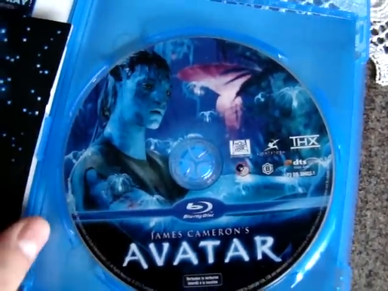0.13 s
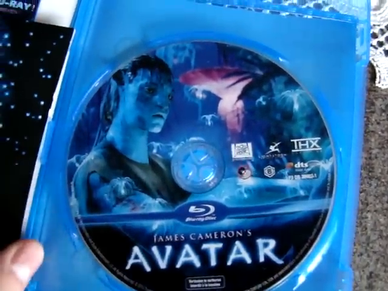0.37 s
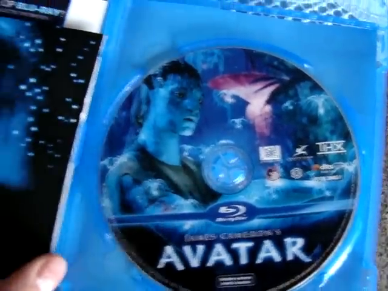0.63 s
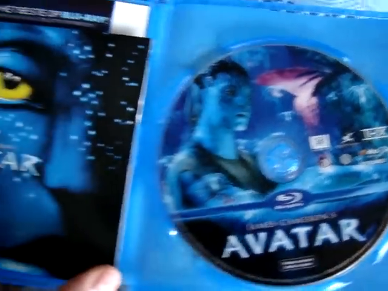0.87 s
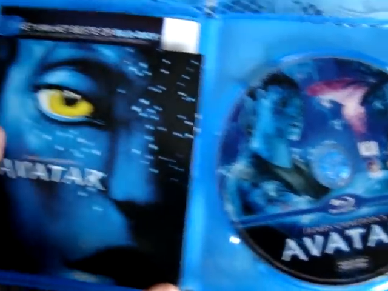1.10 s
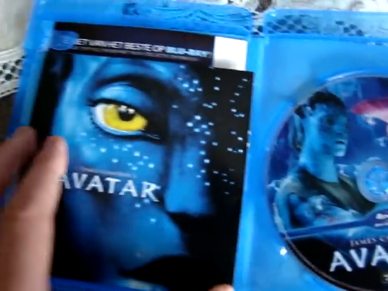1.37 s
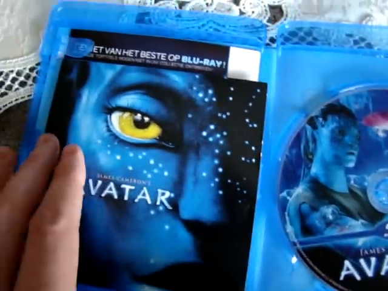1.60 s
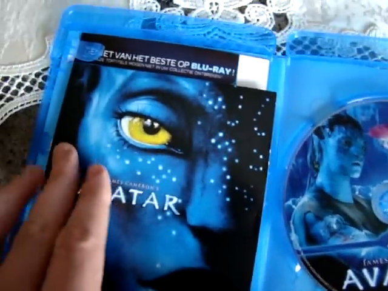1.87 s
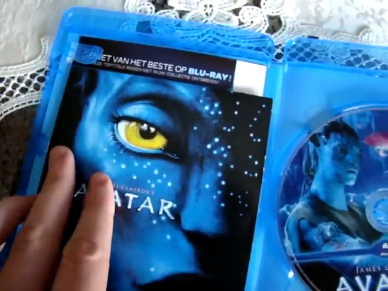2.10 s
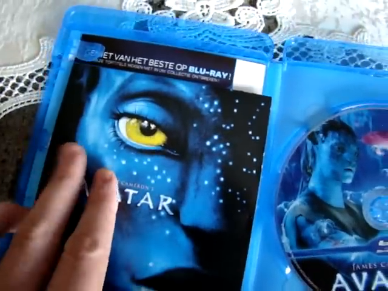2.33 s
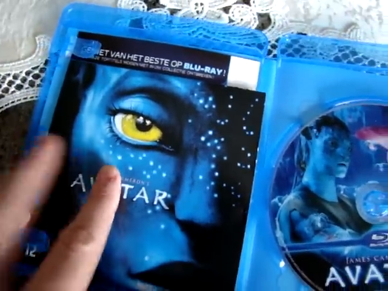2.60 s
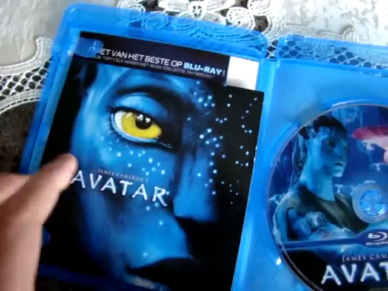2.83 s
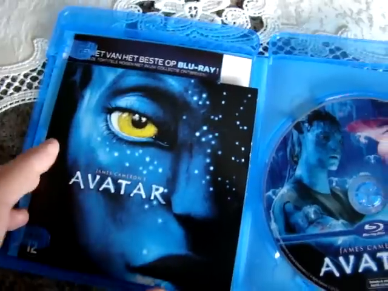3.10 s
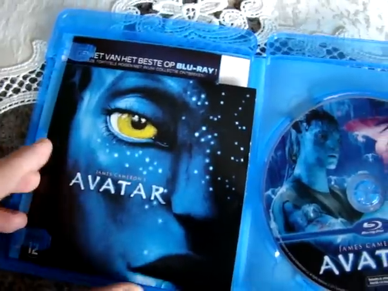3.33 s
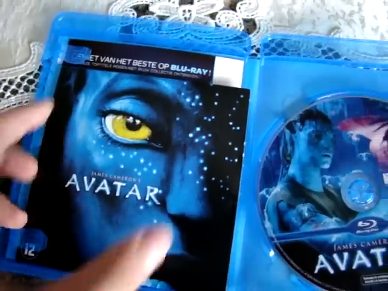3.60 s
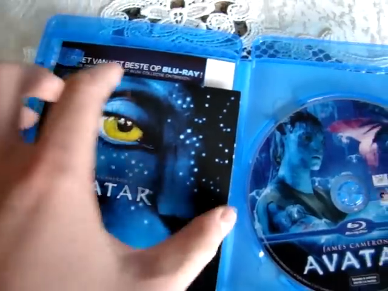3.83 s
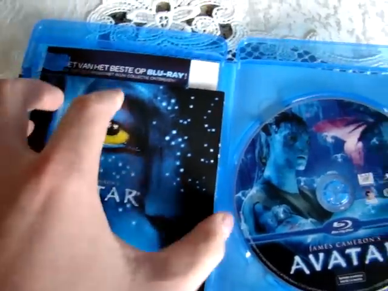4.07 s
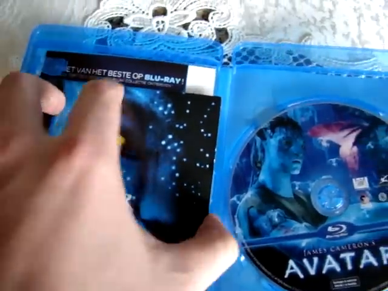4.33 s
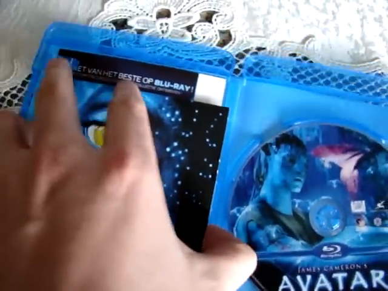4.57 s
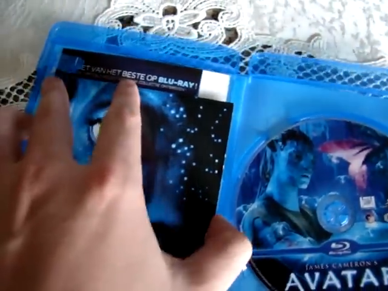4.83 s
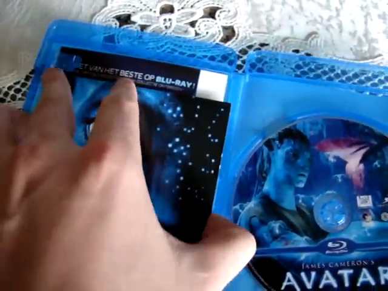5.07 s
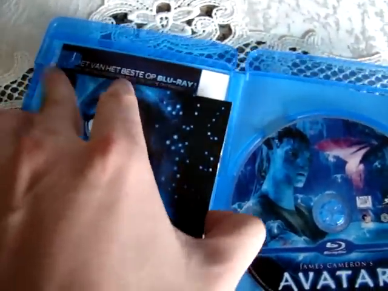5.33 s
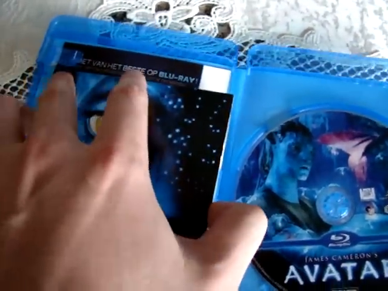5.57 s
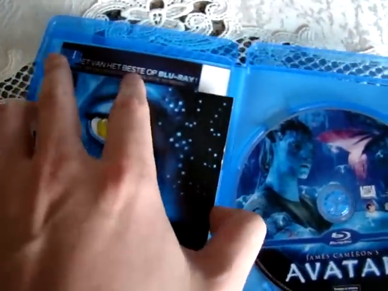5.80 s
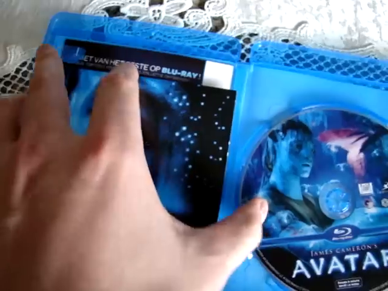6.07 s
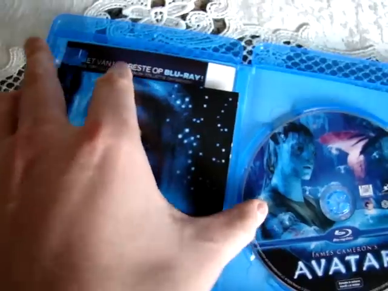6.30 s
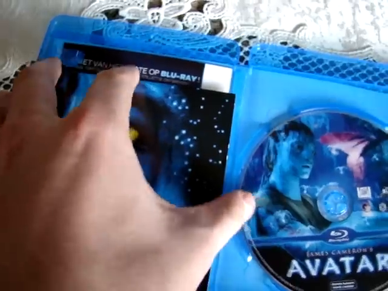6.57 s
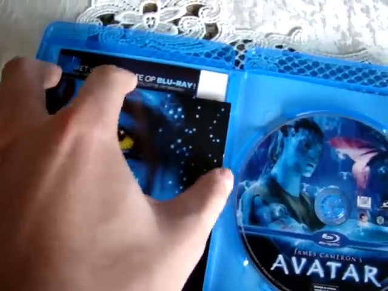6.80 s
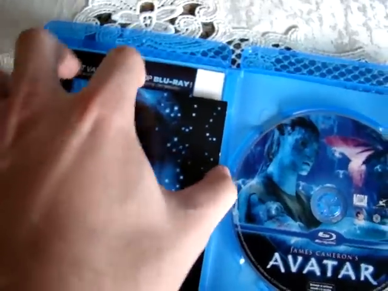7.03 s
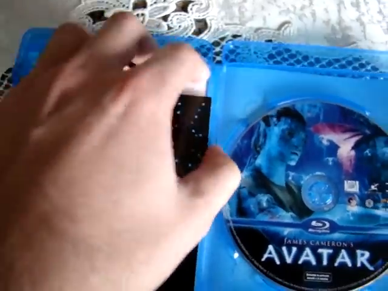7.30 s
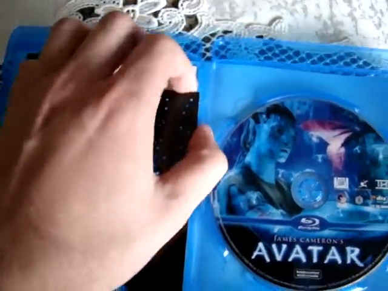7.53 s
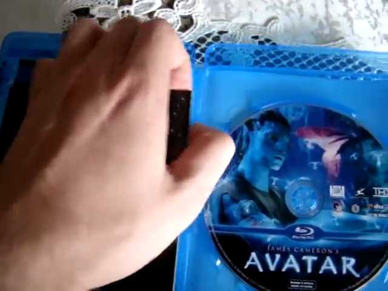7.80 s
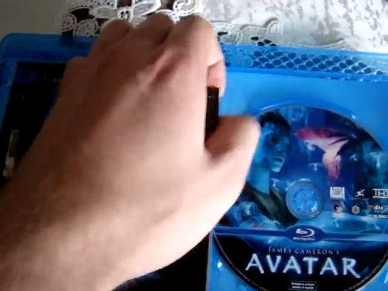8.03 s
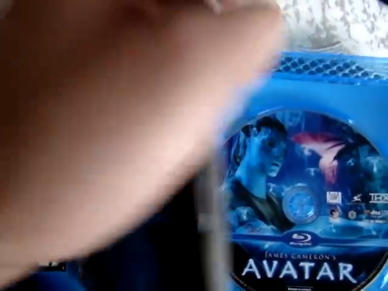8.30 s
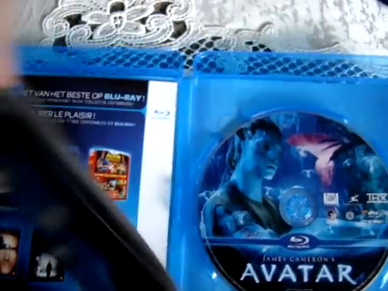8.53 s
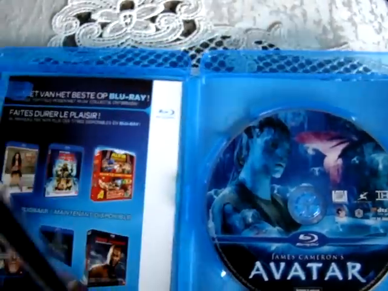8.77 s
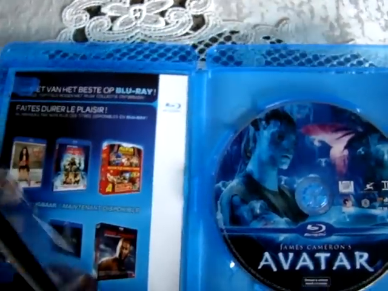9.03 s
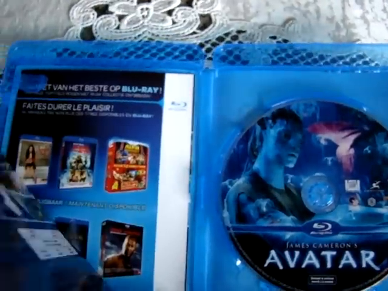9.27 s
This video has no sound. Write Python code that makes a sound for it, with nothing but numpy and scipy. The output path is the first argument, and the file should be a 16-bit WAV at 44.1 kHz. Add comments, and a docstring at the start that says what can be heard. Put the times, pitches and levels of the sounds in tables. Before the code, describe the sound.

Close, sparse plastic clicks and papery rasps grow busier as a booklet is worked loose, ending in a sharp clattering pull and small after-ticks.

```python
"""Fingers push and pry at a glossy paper booklet held under the tabs of an open plastic disc case, in a quiet room.
Bursts of micro-slips click the hollow case into brief ringing; dense friction grains make the paper slide and rasp.
Struck modes make tab snaps, pings, dry cracks and dull taps; two wavering lines squeak; low swings puff air at the
microphone. Below lie shaped room noise, a faint mains hum, a low drone and a thin whine, with a soft dull room tail."""
import sys
import numpy as np
from scipy import signal
from scipy.fft import rfft, irfft
from scipy.io import wavfile

SR = 44100
rng = np.random.default_rng(int(sys.argv[2]) if len(sys.argv) > 2 else 0)


def undo_db(level):
    """Turn decibels back into plain size, where 20 dB means ten times bigger."""
    steps = np.asarray(level, float) / 20
    return 10 ** steps


def unload_audio(sound):
    """Save the sound as a 16-bit wav file, at the path given as the first command line argument."""
    columns = np.transpose(np.atleast_2d(sound))
    # keep every value between -1 and 1, then stretch to whole-number steps
    steps = np.round(np.clip(columns, -1, 1) * 32767)
    wavfile.write(sys.argv[1], SR, steps.astype(np.int16))


N = 414540  # samples, 9.4 s

# Levels in the tables are relative, each source adds its own gain; only levels marked rms are final.

# Room noise colour: pitch_hz, density_db (per Hz)
ROOM_COLOUR = [(18, -44), (30, -20), (50, -14), (93, -10), (144, -7), (224, -2), (500, -2), (860, -4),
               (1410, -5), (2500, -8), (4340, -10), (7090, -13), (9900, -14), (10500, -30), (22000, -120)]
ROOM_NOISE_RMS_DB = -57
# Low drone and thin whine: pitch_hz, width_hz, level_db (rms)
DRONE_AND_WHINE = [(228, 14, -77), (7870, 110, -72.5)]
HUM_HZ, HUM_RMS_DB = 99, -79.5
ROOM_T60_S, ROOM_TAIL_DB = 0.19, -52
# Air puffs at the microphone: start_s, peak_db
AIR_PUFFS = [(6.801, -42.5), (8.593, -44), (8.638, -46), (8.687, -46)]

# Modes of the case and the paper lying in it: pitch_hz, level_db, t60_s
CASE_MODES = [(229, -10.5, 0.018), (446, -10.5, 0.019), (563, -5, 0.0093), (870, -0.5, 0.0081),
              (1027, -1.5, 0.021), (1253, 4, 0.01), (1385, 2, .05), (1480, 1, .045), (1610, 1, .035),
              (1707, 2, 0.0086), (1870, 0.5, 0.0098), (2020, -0.5, 0.016), (2177, -9, 0.018),
              (2300, -5.5, 0.05), (2515, 0, 0.01), (2760, -1, 0.01), (3114, -4, 0.028), (3290, -6, 0.026),
              (3500, -2.5, 0.012), (3850, 1.5, 0.012), (4354, 3.5, 0.012), (4830, 0.5, 0.017),
              (5500, 0, 0.0066), (6080, -2, 0.005), (6680, -9, 0.02), (7170, -8.5, 0.014),
              (7640, -4.5, 0.0028), (9260, -1.5, 0.00064), (9877, 6, 0.01)]
# Edges of the hollow ring, then of the crossover into the treble
HOLLOW_FROM_HZ, HOLLOW_TOP_HZ, BRIGHT_FROM_HZ, BRIGHT_FULL_HZ = 1300, 1650, 4200, 6500
# The hand on the case shifts its hollow ring: time_s, pitch_hz
HOLLOW_RING_PITCH = [(0, 1470), (2.2, 1350), (4, 1407), (6.5, 1435), (6.77, 1520), (6.87, 1430),
                     (7.2, 1410), (7.44, 1416), (7.6, 1430), (7.73, 1460), (7.8, 1380), (8.03, 1446),
                     (8.38, 1320), (9.4, 1330)]
HOLLOW_FALL_DB = 8.5  # per 100 Hz away from that pitch
# Where the paper crackles and rasps most, and how narrowly: time_s, pitch_hz, extra_fall_db (per octave)
PAPER_CENTRE = [(0, 3100, 2), (.65, 3480, 6), (.85, 3480, 0), (1, 2450, -2.5), (1.5, 2640, 4.5),
                (2.1, 2300, -3), (2.6, 2560, -2), (3, 2900, -0.5), (3.7, 2460, 1), (3.9, 2800, 2.5),
                (4.5, 2700, 9.5), (5.3, 2500, -0.5), (5.9, 2700, 2), (6.25, 2460, 12), (6.7, 2370, -2),
                (6.8, 2170, -3), (6.83, 2100, -4.5), (6.98, 2820, 10), (7.07, 2650, -1.5), (7.19, 3040, 4),
                (7.3, 2640, 1.5), (7.44, 2436, 8), (7.65, 3160, 0.5), (7.73, 2900, -1), (7.86, 2300, -6.5),
                (8.03, 2455, 0), (8.2, 2440, 0), (8.32, 3700, 6), (8.39, 2110, 3.5), (8.469, 2450, 1),
                (8.57, 3800, -2), (8.6, 3130, 4.5), (9.1, 2920, -8), (9.4, 3060, -4.5)]

# Faint breathy squeaks as the booklet slides: time_s, pitch_hz, level_db, octave_db
SQUEAK_CURVE = [(7.07, 2510, -85, -8), (7.1, 2570, -53, -9), (7.14, 2810, -55.5, -4), (7.18, 2900, -57, -1),
                (7.22, 2860, -79, -2), (7.98, 1500, -85, -6), (8.06, 1518, -57.5, -7), (8.12, 1707, -65, 6),
                (8.2, 1752, -60.5, -2), (8.28, 1650, -57, -2.5), (8.35, 1454, -54.5, -10),
                (8.38, 1390, -90, -12)]
SQUEAK_WAVER_HZ = 110  # corner of the chance that wavers the lower line

# Strokes of paper and fingers over the case:
# peak_s, rise_s, fall_s, rasp_db, hollow_db (over rasp), hiss_db (over rasp)
RUB_STROKES = [(.4, 0.085, 0.11, -55.5, 2, -4.5), (.71, 0.054, 0.18, -43, -28, -10.5),
               (.77, .1, 0.14, -52, -16, -5), (.83, 0.14, 0.11, -48, -15, -7),
               (.97, 0.25, 0.33, -54.5, -3, -7), (1.6, 0.47, 1, -58.5, -6, -3.5),
               (2.05, 0.17, 0.043, -53.5, -9, -1), (2.1, .06, 0.073, -63, 8, -11),
               (2.17, .06, 0.052, -66, 2, -14), (2.25, 0.15, 0.014, -57, 3, -31),
               (2.35, 0.018, 0.14, -50, -3, -5), (2.72, 0.24, 0.042, -57, -19, -2),
               (2.87, 0.22, .08, -62.5, -10, 7.5), (3.01, 0.09, 0.05, -49.5, -7, -5),
               (3.5, 0.61, 0.32, -58, -8, -2.5), (3.7, 0.1, 0.04, -45, -15, -8),
               (3.93, 0.028, 0.22, -49, -1, -28), (4.5, 0.17, 0.21, -46, -16, -5.5),
               (4.6, 0.043, 0.039, -63, 11, -20), (4.741, 0.064, 0.22, -46, -10, -10.5),
               (5.33, 0.14, 0.17, -50, -7, -10.5), (5.45, 0.05, 0.021, -47.5, -3, -19),
               (5.6, 0.22, 0.26, -52, 0, -29), (5.72, 0.033, .05, -63, 4, -20),
               (5.83, .01, 0.037, -55, 4, -16), (5.9, 0.16, 0.095, -48, -4, -25),
               (5.98, 0.026, 0.11, -41.5, -10, -11.5), (6.55, 0.025, 0.04, -57.5, 10.5, -23),
               (6.66, 0.31, 0.052, -52.5, -2, -17), (6.755, 0.04, 0.017, -46, -2, -14),
               (6.822, 0.018, 0.047, -34, 1, -34), (6.85, 0.018, .04, -45, 2, -24),
               (6.899, 0.03, 0.16, -49.5, 3, -10), (7.16, 0.056, 0.063, -43.5, -19, -3),
               (7.25, 0.059, 0.034, -50, 2, -7), (7.401, 0.12, 0.069, -47, -6, -5),
               (7.52, 0.06, .08, -59, 16, -22), (7.67, 0.081, 0.03, -39.5, -4, -30),
               (7.75, 0.027, 0.066, -36, 4, -33), (7.81, 0.013, 0.19, -46, -3, -1),
               (8.04, 0.13, 0.14, -45.5, -2.5, -9), (8.15, .08, 0.17, -61.5, -8, 5),
               (8.345, 0.068, 0.0085, -42, -10, -3.5), (8.4, 0.0065, 0.068, -39, 11, -22),
               (8.469, 0.02, 0.038, -37.5, -8, -26), (8.5, 0.026, 0.02, -40.5, 0, -6.5),
               (8.568, 0.0047, 0.0018, -33, -21, -7), (8.603, 0.0018, 0.055, -28, 4.5, -29),
               (8.648, 0.021, 0.14, -40, 4, -38), (9.13, 0.033, 0.051, -46.5, 6.5, -31),
               (9.39, 0.028, .1, -35.5, -7, 5.5)]
STROKE_FADE_DB = 12  # lost over one rise or fall time
# Light touch between strokes: rasp_db, hollow_db, hiss_db
RESTING_TOUCH_DB = (-75, -66.5, -75.5)

# Hard snaps of a plastic tab: start_s, peak_db
TAB_SNAPS = [(4.2504, -18), (4.7297, -15.5)]
# Modes of the tab and the wall behind it: pitch_hz, level_db, t60_s
TAB_MODES = [(270, -13.5, 0.009), (415, -6.5, 0.015), (614, -8, 0.026), (1160, -19.5, 0.024),
             (1380, -17.5, 0.027), (1773, -8.5, 0.027), (2050, -14, 0.0089), (2830, -13.5, 0.018),
             (3180, -20, 0.029), (3870, -11.5, 0.014), (4520, -14, 0.016), (4980, -4, 0.013),
             (5130, -6, 0.0079), (6300, -26, 0.005), (6700, -26, .005), (7600, -29, 0.008),
             (10000, -26, 0.0059)]
# A free edge of paper or a flap of plastic pings: start_s, peak_db, pitch_hz
EDGE_PINGS = [(.7344, -34, 5400), (.7484, -32, 5590), (.8011, -29, 6760), (.817, -26, 6570),
              (2.612, -25, 7260), (2.612, -38, 2620), (2.8814, -35, 2470), (3.025, -30, 4900),
              (3.68, -36, 2300), (3.875, -28, 2700), (3.904, -29, 2340), (4.05, -36, 3500),
              (5.278, -43, 2590), (5.388, -40, 3200), (5.587, -32, 2050), (5.607, -33, 2860),
              (5.655, -29, 2030), (5.822, -31, 1155), (5.855, -31, 2370), (5.884, -25, 2480),
              (5.8944, -23, 2390), (5.895, -20, 6470), (5.911, -33.5, 1090), (5.961, -34, 2380),
              (6.041, -29, 2090), (6.538, -26, 2500), (6.587, -25, 2210), (6.668, -32, 2840),
              (6.679, -29, 2600), (6.774, -37, 2970), (6.786, -38, 2300), (6.7977, -16.5, 1570),
              (6.801, -15, 2420), (6.809, -16, 1580), (6.8223, -15, 1480), (6.807, -13, 3220),
              (6.811, -17, 2020), (6.824, -19, 2020), (6.832, -33, 1060), (6.841, -33, 4200),
              (6.8643, -30, 3000), (7.07, -20, 2580), (7.1891, -23, 3270), (7.2589, -30.5, 2650),
              (7.2774, -38, 3160), (7.281, -36, 4150), (7.428, -39, 2120), (7.441, -33, 2600),
              (7.562, -23, 3240), (7.608, -18, 1440), (7.727, -23, 1520), (7.749, -22, 1520),
              (7.764, -26, 3230), (7.7265, -17.5, 2790), (7.728, -27, 3760), (7.7907, -32.5, 4200),
              (7.857, -29, 2300), (8.024, -34, 2840), (8.024, -23, 1460), (8.035, -28.5, 1400),
              (8.3825, -14.5, 1380), (8.464, -17, 1405), (8.1993, -45, 2320), (8.3923, -17, 2100),
              (8.4055, -21, 2050), (8.4574, -17, 3360), (8.4642, -16.5, 2160), (8.478, -28, 2050),
              (8.572, -32, 4760), (8.597, -13, 3520), (8.612, -15.5, 3100), (8.6256, -15, 2250),
              (8.627, -12, 1425), (8.627, -18, 3500)]
PING_GAIN_DB, PING_CYCLES, PING_SLIP_MS = -8, 55, 0.68  # cycles to fall by 60 dB
# Dry cracks as a stuck edge lets go: start_s, peak_db, pitch_hz, ring_cycles (to fall by 60 dB)
DRY_CRACKS = [(0.6843, -35, 990, 2.9), (0.687, -48, 1600, 3.5), (.6867, -34, 700, 3.5),
              (3.876, -31, 2700, 12), (3.8872, -24, 2580, 18), (3.9045, -23, 4500, 6),
              (3.905, -31, 1200, 9.6), (3.9297, -24, 3300, 8), (3.9302, -26, 5500, 8),
              (3.9309, -30, 1410, 7.8), (5.575, -21, 2300, 5.3), (5.5838, -27, 3570, 6),
              (5.5851, -12.5, 3230, 6.5), (5.6072, -31, 2900, 16), (6.2675, -22, 2570, 8.2),
              (6.81, -24, 3300, 5), (7.0705, -12, 3500, 4.4), (8.593, -16, 1490, 5.1)]
# Dull fingertip taps: start_s, level_db
FINGER_TAPS = [(.6855, -32.5), (1.368, -35.5), (1.956, -41.5), (2.172, -41), (2.1872, -34), (2.318, -38),
               (3.026, -36.5), (5.821, -31), (6.587, -37), (6.989, -33), (8.026, -40), (3.785, -33),
               (3.68, -31.5)]
TAP_SLIP_MS = 0.59

# Random faint ticks; TICK_DB is relative to the rasp
TICKS_PER_S, TICK_DB, TICK_SPREAD_DB = 12, 6, 3
TICK_HOLLOW_DB, TICK_BRIGHT_DB, TICK_SLIP_MS = -5, -5, 1.5
FIRM_DB = -58  # rasp level above which ticks break loose
# Ticks and snaps of paper and plastic: start_s, level_db, hollow_db, bright_db, slip_ms (held to 0.2-12)
CASE_CLICKS = [(.686, -56, 2, -22, 1.5), (.734, -40, -29, -22, 3.7), (.802, -43, -20, -5, 2),
               (.817, -37.5, -23, -9, 1.2), (.83, -41, -12, -4, 3.8), (1.368, -38.5, -7, 2, 0.91),
               (1.6158, -45.5, 5, -12, 1.0), (1.622, -51, 0, -12, 1.2), (1.956, -56, 12, 1, 1.8),
               (2.1048, -47, 4, 11, 1.8), (2.122, -49, -3, 2, 2.5), (2.139, -45.5, 5, 11, 3.1),
               (2.155, -48, 0, -5, 2), (2.172, -48, -1, 12, 1.6), (2.188, -52, -1.5, -2, 1.5),
               (2.204, -48, 0, 11, 2.3), (2.222, -49, -2, 4, 2.5), (2.305, -41, -5, 12.5, 0.91),
               (2.319, -46, -5, -13, 1), (2.334, -40.5, 3.5, 10, 5.2), (2.404, -42, 0, 12.5, 3.2),
               (2.611, -43.5, -6, 10.5, 4), (2.705, -45.5, -3, 6, 4.8), (2.786, -48.5, -9, 9.5, 3.9),
               (2.882, -47, -3, 0, 0.87), (2.948, -50, -22, 10, 2.3), (3.026, -45, -11, 18, 0.33),
               (3.6805, -36, 1.5, -1, 1), (3.693, -48, 8, -15, 1.5), (3.7052, -33.5, 0, 2, 1.4),
               (3.7145, -38.5, 1, -4, 1.7), (3.722, -47, 5, -10, 1.5), (3.784, -47, 11.5, 3, 1.1),
               (3.875, -36.5, -13, -11, 1.4), (3.885, -36.5, -3, -28, 1.3), (3.904, -29.5, -7.5, 5, 1.2),
               (3.915, -32, -10, -26, 1.1), (3.9298, -23.5, -11.5, 1, 0.65), (3.983, -41.5, -18, 7, 6.4),
               (4.05, -40, -1, -21, 1.4), (4.137, -36, 0, 6, 1.3), (4.4, -42.5, -6, 4.5, 4.7),
               (4.447, -44, 5, -13, 2.6), (4.578, -43, -5, -17, 1), (4.594, -45.5, 4, 10, 4.4),
               (4.7425, -42, 10, -45, 1.8), (4.78, -39.5, -12, -7, 3.3), (4.924, -41, -10, 6, 2.3),
               (4.933, -36.5, -1.5, 5, 2.8), (5.069, -35.5, -17, 9.5, 1.2), (5.095, -43.5, -25, -3, 3.1),
               (5.162, -45, 6.5, 2, 3.6), (5.277, -35, -4, -3, 1.6), (5.294, -33.5, 0, -13.5, 0.39),
               (5.32, -38, -18, 4, 5.6), (5.389, -37.5, -15, -2, 1.2), (5.369, -40, -1, -15, 0.72),
               (5.433, -38, -25, 5, 6), (5.463, -48, -10, 8, 0.68), (5.549, -45, -11, -25, 2.1),
               (5.575, -33, -8, 6, .8), (5.579, -37.5, -1, 14.5, 2.3), (5.5845, -28, -6, -5, 0.67),
               (5.601, -62, -15, -31, 1), (5.608, -43, 1, -31, 1.2), (5.655, -42, -16, 8, 6.2),
               (5.7, -28, -5, 2, 1.55), (5.733, -42, -1, -23, 0.71), (5.75, -28, -21.5, 0, 0.75),
               (5.82, -47, 4, -14, 0.82), (5.856, -39, -10, 3, 2.3), (5.885, -36, -17, 2, 4.2),
               (5.895, -32.5, -20, 4.5, 3.4), (5.911, -35, -7, 7, 0.61), (5.928, -41, 3, -17, 1.6),
               (5.948, -36.5, 0.5, -13, 0.75), (5.961, -32.5, 1, 3, 2.4), (6.039, -33.5, -5, -4, 7),
               (6.066, -42, 5.5, 0, 0.91), (6.081, -51, 3, -27, 0.43), (6.114, -43, 9, 1, 3.5),
               (6.209, -34.5, -26, 8, 1.9), (6.227, -33, -29, 4, 0.63), (6.24, -50, 4, -10, 1),
               (6.267, -31.5, -5, 8.5, 0.5), (6.291, -47, -2, -16, 0.76), (6.354, -43, -8, 5, 0.78),
               (6.538, -35.5, -16, 5.5, 1.3), (6.586, -37.5, -30, 5.5, 1), (6.67, -40.5, -14, 7, 4.9),
               (6.767, -45, 17, 9, 3.8), (6.774, -55, -9, -17, 1.4), (6.8, -27.5, 6, 8, 2.2),
               (6.809, -20.5, -17, -12, 2.7), (6.817, -33.5, 9.5, 6, 2.3), (6.823, -26.5, -2, -15, 1.5),
               (6.833, -55, 13, -21, 1.3), (6.841, -57, 0, -12, 1.9), (6.864, -39.5, -15, 12.5, 1.1),
               (6.978, -32, -28, -23, 0.29), (6.989, -48, 7, -30, 1.2), (6.999, -35, -16, 7.5, 4),
               (7.07, -25, -22, 0, 1.4), (7.177, -38, -5, -7, 2.4), (7.191, -35, -6, 6, 6.6),
               (7.211, -42, 7, 8, 1.1), (7.243, -40.5, -8, 8, 7.1), (7.258, -44, -19, -14, 1.8),
               (7.278, -38, -3, 6.5, 6), (7.425, -43, 1, -1, 2.3), (7.441, -35, 3, -9, 1.5),
               (7.452, -44, 7, -8, 1.7), (7.472, -49.5, 21.5, 0, 1.1), (7.509, -47.5, 15.5, 5, 0.71),
               (7.562, -27.5, -21, -1, 2), (7.596, -33, -6, 8, 1.4), (7.609, -32.5, -8, 7.5, 1.3),
               (7.666, -37, -7, 11.5, 16), (7.685, -36.5, -4, 1, 4.6), (7.727, -27.5, -18, 5.5, 4.1),
               (7.747, -28.5, 2, 4, 1.7), (7.764, -33.5, 9, -29, 2), (7.791, -29.5, -15, 4.5, 2.5),
               (7.818, -43, 10, 13, 9.1), (7.856, -55, 16, -13, 4.1), (7.905, -47, 7, -5, 2.8),
               (7.966, -43, -13, 7, 3.1), (7.993, -38, -8, 5, 4.3), (8.024, -46, 12, -15, 1.7),
               (8.034, -49, -17, -17, 1.9), (8.2, -39, -9, -15, 3.1), (8.315, -37, -22, -4, 1.6),
               (8.3832, -24, 6, -3, 2.3), (8.393, -27.5, 8, -13, 7), (8.408, -32.5, -14, 6.5, 2.9),
               (8.418, -32, -7, -1, 1.1), (8.453, -33.5, 0, -5, 1.7), (8.458, -34.5, 10, 2, 1.6),
               (8.465, -41, 9, -15, 2.1), (8.5935, -18.5, 9.5, 4, 0.71), (8.596, -21.5, -3, 6, 1.9),
               (8.605, -22.5, 2, -3, 3.1), (8.612, -22, -12, -2, 1.9), (8.625, -26, 7, 11, 2.7),
               (8.64, -28, 4, 11, 1.5), (8.645, -32, 2, 10, 1.7), (8.654, -33, 4, 13, 4.7),
               (8.671, -40, 1, -12, 2.5), (8.687, -27.5, -3.5, 11.5, 1.4), (8.748, -30.5, -25, 4, 0.97),
               (8.759, -33, -11, 2, 1.3), (8.792, -40, 0, -8, 0.4), (8.874, -44, -4, 6.5, 1),
               (9.024, -44.5, 1, 7.5, 4.8), (9.114, -41.5, -4, 12, 3), (9.122, -31, -6, 7.5, 0.58),
               (9.334, -39, 0, 12.5, 1.8), (9.345, -38.5, 2, 4, 4.5), (9.369, -31.5, -8, 9, 2.9),
               (9.378, -30, -32, -1, 6.1)]


def rms_one(x):
    """Scales to unit rms."""
    return x / np.sqrt(np.mean(x ** 2) + 1e-20)


def in_time(rows):
    """Joins curve rows by straight lines, one value per sample."""
    s, *columns = np.transpose(rows)
    return [np.interp(np.arange(N) / SR, s, c) for c in columns]


def drift(rate_hz):
    """Slow chance: noise through a double one-pole low-pass, scaled to unit rms."""
    r = np.exp(-2 * np.pi * rate_hz / SR)
    slow = signal.lfilter([1], [1, -2 * r, r * r], rng.standard_normal(N + SR))
    return rms_one(slow[SR:])  # the first second lets the filter settle


def room_noise():
    """Steady coloured noise, a hum that wavers slightly and two narrow bands of noise heard as unsteady tones."""
    hz = np.arange(N // 2 + 1) * SR / N + 1e-3
    table_hz, table_db = np.transpose(ROOM_COLOUR)
    colour = undo_db(np.interp(np.log(hz), np.log(table_hz), table_db))
    out = undo_db(ROOM_NOISE_RMS_DB) * rms_one(irfft(rfft(rng.standard_normal(N)) * colour, N))
    for tone_hz, width_hz, level_db in DRONE_AND_WHINE:
        narrow = 1 / (1 + ((hz - tone_hz) / width_hz * 2) ** 2)
        out += undo_db(level_db) * rms_one(irfft(rfft(rng.standard_normal(N)) * narrow, N))
    phase = 2 * np.pi * np.cumsum(HUM_HZ * (1 + 0.018 * drift(2.5))) / SR
    hum = undo_db(HUM_RMS_DB + 0.82 * drift(3)) * np.sqrt(2) * np.sin(phase)
    return out + hum


def room(x):
    """A soft, dull tail from walls and furniture: decaying, low-passed noise convolved with the sound."""
    t = np.arange(SR // 2) / SR
    tail = rng.standard_normal(len(t)) * undo_db(-60 * t / ROOM_T60_S) * (t > .004)
    tail = signal.lfilter([1], [1, -.5], tail)
    tail /= np.sqrt(np.sum(tail ** 2))
    return undo_db(ROOM_TAIL_DB) * signal.fftconvolve(x, tail)[:N]


def puffs():
    """A short push of air on the diaphragm: one low swing that dies at once."""
    push = np.zeros(N)
    for s, peak_db in AIR_PUFFS:
        push[round(s * SR)] = undo_db(peak_db + 46.5)
    return signal.sosfilt(signal.butter(1, [25, 160], "band", fs=SR, output="sos"), push)


def ring(force, hz, t60):
    """One mode; white noise passes with the same power whatever the decay, little is radiated below it."""
    r = undo_db(-60 / (t60 * SR))
    w = 2 * np.pi * hz / SR
    gain = np.sqrt(1 - r)
    tone = signal.lfilter(gain * np.array([1, 0, -1]), [1, -2 * r * np.cos(w), r * r], force + 1e-18)
    return signal.lfilter(*signal.butter(2, .75 * hz, "high", fs=SR), tone)


def register(hz, s, hollow_db, middle_db, bright_db, fall_db):
    """Mode strength at times s: low thud, hollow ring, or a middle peaking at its centre that fades into treble."""
    if hz < HOLLOW_FROM_HZ:
        return 0.4 * hollow_db + 0.65 * middle_db - 2.0
    if hz < HOLLOW_TOP_HZ:
        ring_hz = np.interp(s, *np.transpose(HOLLOW_RING_PITCH))
        return hollow_db + 1.5 - HOLLOW_FALL_DB * np.abs(hz - ring_hz) / 100
    at, centre_hz, extra_db = np.transpose(PAPER_CENTRE)
    treble = np.interp(hz, [BRIGHT_FROM_HZ, BRIGHT_FULL_HZ], [0, 1])
    octaves_away = np.abs(np.log2(hz / np.interp(s, at, centre_hz)))
    fall = fall_db + np.interp(s, at, extra_db)
    return treble * bright_db + (1 - treble) * (middle_db - fall * octaves_away)


def squeak():
    """Two wavering lines an octave apart that glide along the drawn pitch curve."""
    pitch_hz, level_db, octave_db = in_time(SQUEAK_CURVE)
    phase = 2 * np.pi * np.cumsum(pitch_hz) / SR
    lower = drift(SQUEAK_WAVER_HZ) * np.sin(phase)
    upper = undo_db(octave_db) * drift(2 * SQUEAK_WAVER_HZ) * np.sin(2 * phase)
    return undo_db(level_db) * np.sqrt(2) * (lower + upper)


def rubbing():
    """Levels in dB of rasp, hollow ring and hiss: the strokes swell and fade, their powers add."""
    t = np.arange(0, N, 64) / SR
    power = undo_db(2 * np.array(RESTING_TOUCH_DB))[:, None] + 0 * t
    for s, rise_s, fall_s, rasp_db, hollow_db, hiss_db in RUB_STROKES:
        away = np.where(t < s, (s - t) / rise_s, (t - s) / fall_s)
        parts_db = np.array([[0], [hollow_db], [hiss_db]])
        power = power + undo_db(2 * (rasp_db - STROKE_FADE_DB * away + parts_db))
    return [np.interp(np.arange(N) / SR, t, 10 * np.log10(p)) for p in power]


def sliding(rasp_db, hollow_db, hiss_db):
    """Friction: thousands of uneven grains a second, lightly clumped, rub the modes of the case."""
    t = np.arange(N) / SR
    clumps = undo_db(2.1 * np.array([drift(40) for _ in range(3)]))
    grains = rng.choice([-1, 1], (3, N)) * undo_db(4.2 * np.minimum(rng.exponential(1, (3, N)), 5))
    present = rng.random((3, N)) < 5500 / SR  # 5500 grains a second in each of three streams
    grains = rms_one(grains * present * clumps)
    out = np.zeros(N)
    for k, (hz, mode_db, t60) in enumerate(CASE_MODES):
        rub_db = register(hz, t, hollow_db - 8.0, rasp_db - 10.5, hiss_db - 4.5, fall_db=7.0)
        out += ring(grains[k % 3] * undo_db(rub_db + mode_db), hz, t60) * (-1) ** k
    return out


def snaps():
    """The tab lets go, and chatters against the wall for a few ms."""
    chatter = ((0, -10), (.6, 3), (1.5, 4), (2.5, -2), (4.2, -7), (5.9, -9))  # lag_ms, level_db
    force = np.zeros(N)
    for s, peak_db in TAB_SNAPS:
        for lag_ms, part_db in chatter:
            force[round((s + lag_ms / 1000) * SR)] += undo_db(peak_db + part_db + 14.5)
    return sum(undo_db(db) * ring(force, hz, t60) * (-1) ** k for k, (hz, db, t60) in enumerate(TAB_MODES))


def pings():
    """A short uneven slip into one mode that rings for some dozens of cycles."""
    out, age = np.zeros(N + SR), np.arange(SR // 20)
    noise = rng.standard_normal((len(EDGE_PINGS), len(age)))
    for (s, peak_db, hz), chance in zip(EDGE_PINGS, noise):
        slip = chance * np.exp(-age / SR * 1000 / PING_SLIP_MS)
        tone = ring(slip, hz, PING_CYCLES / hz)
        out[round(s * SR) + age] += undo_db(peak_db + PING_GAIN_DB) * tone / np.max(np.abs(tone))
    return out[:N]


def cracks():
    """One sharp blow into a heavily damped mode; a small edge radiates no bass."""
    out, age = np.zeros(N + SR), np.arange(SR // 50)
    for s, peak_db, hz, cycles in DRY_CRACKS:
        decay = undo_db(peak_db - 60 * age / SR * hz / cycles)
        swing = decay * np.sin(2 * np.pi * hz * age / SR)
        out[round(s * SR) + age] += signal.lfilter(*signal.butter(2, .35 * hz, "high", fs=SR), swing)
    return out[:N]


def taps():
    """Soft fingertips stir only the low modes of the case."""
    low_modes = [mode for mode in CASE_MODES if mode[0] < HOLLOW_FROM_HZ]
    return clicks([(s, db, 0, 0, TAP_SLIP_MS) for s, db in FINGER_TAPS], low_modes)


def ticks(rasp_db):
    """Click rows at random moments of the firmer strokes, their level following the rasp."""
    u, z = rng.random((200, 2)), rng.standard_normal((200, 4))
    s = np.cumsum(-np.log(u[:, 0] + 1e-9) / TICKS_PER_S)
    under_db = rasp_db[np.minimum(s * SR, N - 1).astype(int)]
    level_db = np.minimum(under_db + TICK_DB + TICK_SPREAD_DB * z[:, 0], -51)
    hollow_db = TICK_HOLLOW_DB + 3 * z[:, 1]
    bright_db = TICK_BRIGHT_DB + 7 * z[:, 2]
    slip_ms = TICK_SLIP_MS * np.exp(.5 * z[:, 3])
    rows = np.transpose([s, level_db, hollow_db, bright_db, slip_ms])
    return rows[(s > .02) & (s < N / SR) & (under_db > FIRM_DB)]


def clicks(rows, modes):
    """Each click is a burst of micro-slips that strikes every mode with a strength of its own."""
    s, level_db, hollow, bright, slip_ms = np.transpose(rows)
    lead, age = SR // 100, np.arange(SR // 25)
    length = np.clip(slip_ms, .2, 12)[:, None]
    age_ms = (age - lead) / SR * 1000
    chance = rng.standard_normal((len(s), 2 * len(age) + len(CASE_MODES)))
    swell_ms = 0.11 * length ** 2.19  # long slips build up, short ones crack at once
    onset = 1 / (1 + np.exp(np.minimum(-age_ms / swell_ms, 50)))
    envelope = np.exp(-(np.maximum(age_ms, 0) / length) ** 1.04) * onset
    at = np.round(s * SR).astype(int)[:, None] + age - lead
    out = np.zeros(N)
    for k, (hz, mode_db, t60) in enumerate(modes):
        slips = chance[:, k % 2:2 * len(age):2]
        slips = slips * np.abs(slips) * envelope  # uneven: a few strong slips among many weak ones
        slips /= np.sqrt(np.sum(slips ** 2, axis=1, keepdims=True))
        # long modes get their full share
        drive = np.abs(slips @ np.exp(2j * np.pi * hz * age / SR))
        slips /= np.maximum(drive, .4)[:, None] ** min(t60 / .035, 1)
        colour_db = register(hz, s, hollow + 1, 3 + 0 * s, bright + 1, fall_db=11.0)
        chance_db = 2.0 * chance[:, -1 - k]
        blow = undo_db(level_db + mode_db + colour_db + 8.5 + chance_db)[:, None] * length ** 0.16
        force = np.bincount(at.ravel(), (slips * blow).ravel(), N + SR)[:N]
        out += ring(force, hz, t60) * (-1) ** k
    return out


def scene():
    """Case and paper close to the microphone, over the room."""
    rub_db = rubbing()
    case = sliding(*rub_db) + squeak()
    case += snaps() + pings() + cracks() + taps()
    case += clicks(ticks(rub_db[0]), CASE_MODES) + clicks(CASE_CLICKS, CASE_MODES)
    return (case + room(case) + puffs() + room_noise())[None, :]


def roll_off(x):
    """The treble ends steeply here."""
    return signal.sosfilt(signal.butter(12, 11270, fs=SR, output="sos"), x)


def record(dry):
    """The top is cut steeply, 60 dB down from 10650 Hz up."""
    cut = signal.sosfilt(signal.cheby2(12, 60, 10650, fs=SR, output="sos"), dry)
    return roll_off(cut)


dry = scene()
out = record(dry)
unload_audio(out)
```